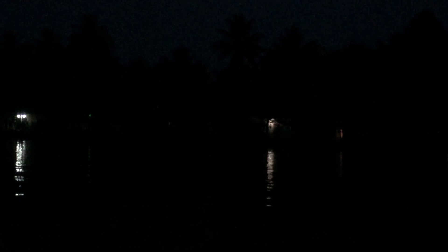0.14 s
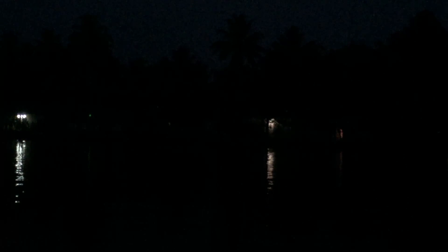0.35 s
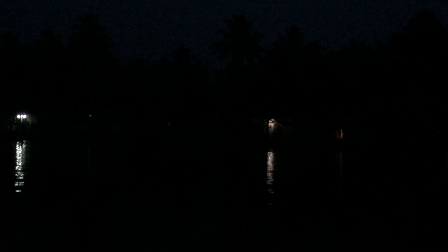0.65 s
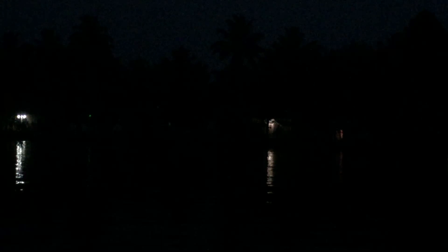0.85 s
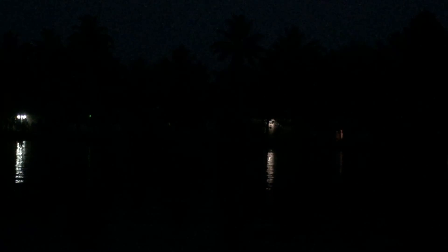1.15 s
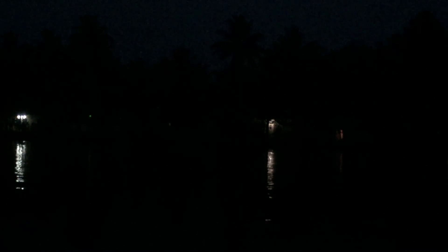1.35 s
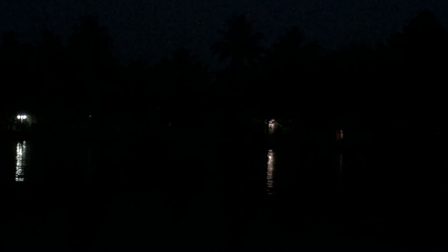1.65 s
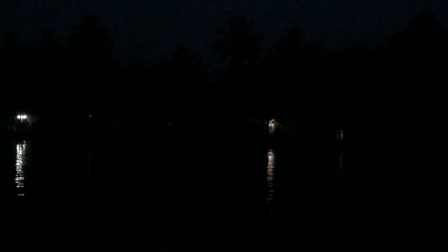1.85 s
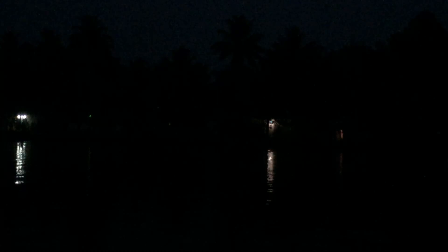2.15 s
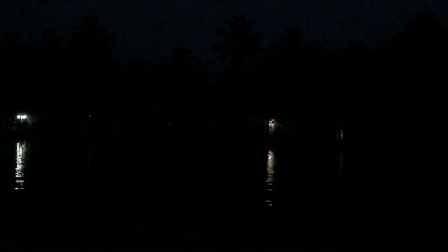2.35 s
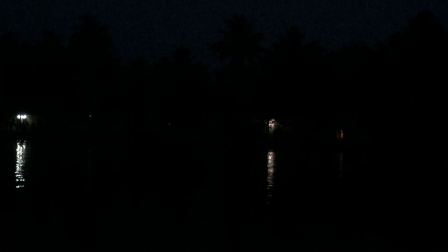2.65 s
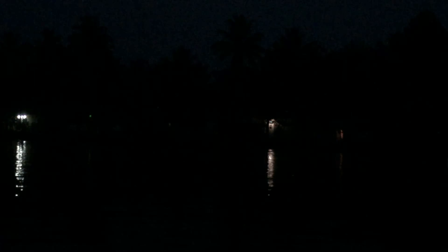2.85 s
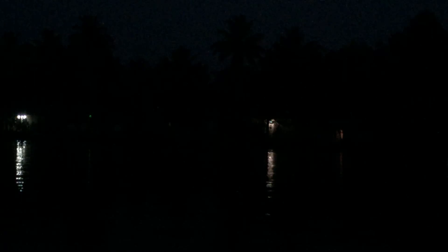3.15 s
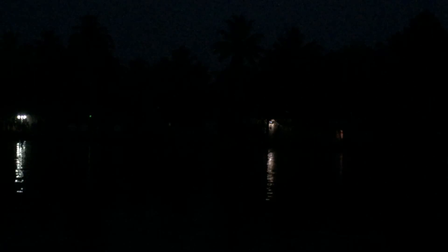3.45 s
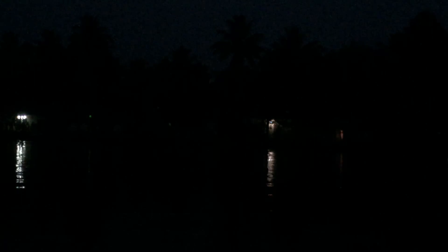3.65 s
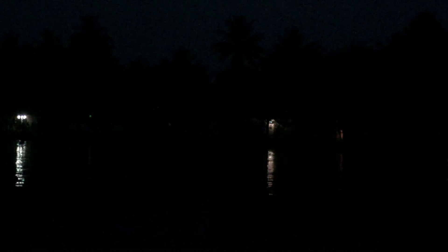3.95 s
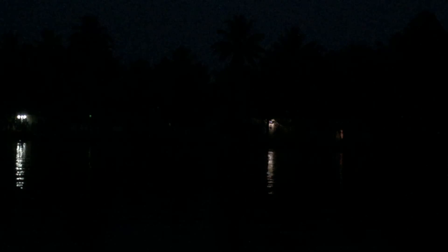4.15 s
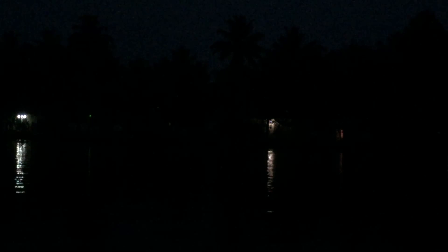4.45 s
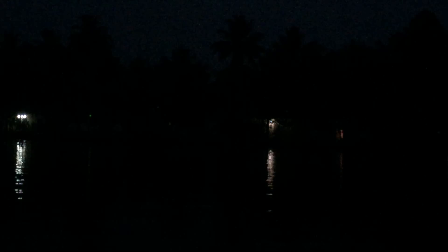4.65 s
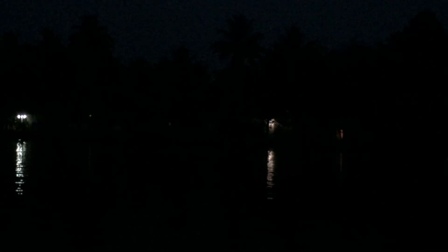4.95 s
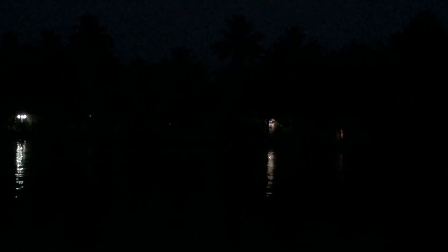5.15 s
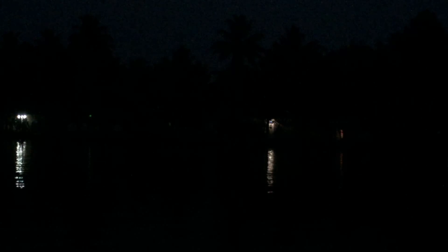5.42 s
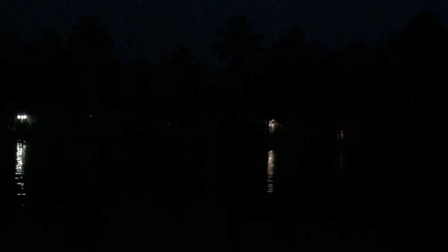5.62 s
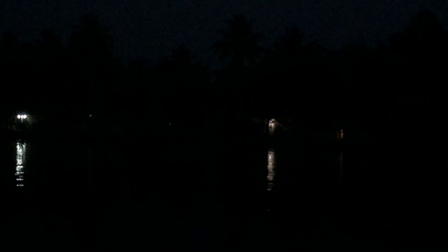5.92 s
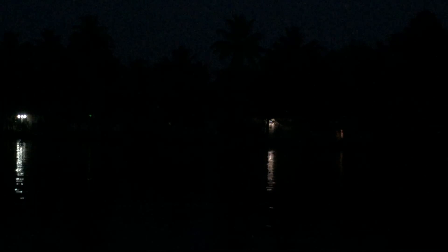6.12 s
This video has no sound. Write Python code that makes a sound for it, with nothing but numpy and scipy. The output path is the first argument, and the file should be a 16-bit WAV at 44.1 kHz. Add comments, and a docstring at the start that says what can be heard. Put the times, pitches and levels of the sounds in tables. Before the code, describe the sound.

Dawn chorus by a pond: one near bird whistles six rising double-humped notes over small birds' twittering, crow caws and a low hum.

```python
"""Dawn beside a pond ringed with trees: at once a low hum, a dull wash and a blurred far chorus of noise bands,
with small birds whistling and trilling on gliding sines and faint quick chirps heard only as echo.
Crows soon caw, harmonic voices coloured by the throat and roughened by a growl. One near bird then sings six
double-humped notes, each higher than the last: a nearly pure tone with breathy overtones.
Decaying noise echoes stand for the trees."""
import sys
import numpy as np
from scipy import signal
from scipy.fft import rfft, irfft
from scipy.io import wavfile

SR = 44100
rng = np.random.default_rng(int(sys.argv[2]) if len(sys.argv) > 2 else 0)


def output_pcm(signal):
    """Save a mono or channel-first signal as 16-bit PCM at the path in sys.argv[1].

    Samples are clipped to [-1, 1] before scaling.
    """
    pcm = np.clip(np.atleast_2d(signal).T, -1, 1) * 32767
    wavfile.write(sys.argv[1], SR, np.round(pcm).astype(np.int16))


N = 276948  # length in samples


def from_db(db):
    """Logarithmic level: 20 dB is a factor of ten in amplitude."""
    return 10 ** (np.asarray(db) / 20)


def rms_one(x):
    """Normalisation: the signal is divided by its root mean square."""
    return x / np.sqrt(np.mean(x ** 2) + 1e-20)


def resonance(x, hz, width_hz):
    """Damped oscillator: a pole pair whose radius sets the bandwidth, with gain 1 on top."""
    radius = np.exp(-np.pi * width_hz / SR)
    zeros = (1 - radius ** 2) / 2 * np.array([1, 0, -1])
    poles = [1, -2 * radius * np.cos(2 * np.pi * hz / SR), radius ** 2]
    return signal.lfilter(zeros, poles, x)


def drift(rate, size=N):
    """Low-passed chance: noise smoothed by a double pole, rms 1, changing about rate times a second."""
    r = np.exp(-2 * np.pi * rate / SR)
    warm_up = 8000
    noise = rng.standard_normal(size + warm_up)
    return rms_one(signal.lfilter([1], [1, -2 * r, r * r], noise)[warm_up:])


def band(low_hz, high_hz):
    """Band-limited noise: white noise between two edges, rms 1."""
    sos = signal.butter(3, [low_hz, high_hz], "band", fs=SR, output="sos")
    return rms_one(signal.sosfilt(sos, rng.standard_normal(N)))


def add(out, start_s, x):
    """Superposition: x is summed into out from start_s on."""
    i = max(round(start_s * SR), 0)
    out[i:i + len(x)] += x[:N - i]


def swell(length_s, rise_s, fall_s):
    """Amplitude envelope: sine-squared ends give a soft onset and release."""
    t = np.arange(round(length_s * SR)) / SR
    ramp = np.minimum(t / rise_s, (length_s - t) / fall_s)
    return np.sin(np.pi / 2 * np.clip(ramp, 0, 1)) ** 2


def glide(length_s, first_hz, middle_hz, last_hz):
    """Frequency glide: a parabola through three pitches."""
    u = np.linspace(0, 1, round(length_s * SR))
    return 2 * (u - .5) * (u - 1) * first_hz + 4 * u * (1 - u) * middle_hz + 2 * u * (u - .5) * last_hz


def turns(hz):
    """Phase is the running integral of frequency, in radians."""
    return 2 * np.pi * np.cumsum(hz) / SR


def background():
    """Broadband and resonant noise: still air, a patchy far wash, a rumble and its wavering hum."""
    # The spectrum of still air. Each row: frequency in Hz, relative level in dB per Hz.
    air_points = np.array([(200, -6.5), (480, -23), (900, -26), (2700, -24), (5000, -29.5), (9000, -39.5),
                           (16900, -51.5)])
    # The far wash drops out and returns; rumble and hum rise and fall together.
    # Each row: time in seconds, wash level in dB, rumble level in dB.
    far_noise = np.array([(0, -56.5, -60.5), (3.298, -55, -63), (3.5, -64.5, -57.5), (6.1, -106, -55.5),
                          (6.2, -57, -60)])
    air_db = -62

    hz = np.maximum(np.fft.rfftfreq(N, 1 / SR), 1)
    shape_db = np.interp(np.log(hz), np.log(air_points[:, 0]), air_points[:, 1])
    shape = from_db(shape_db) * (hz > 120)
    air = rms_one(irfft(rfft(rng.standard_normal(N)) * shape, N))
    air = from_db(air_db + 0.74 * drift(12.0)) * air

    t = np.arange(N) / SR
    wash_db = np.interp(t, far_noise[:, 0], far_noise[:, 1])
    rumble_db = np.interp(t, far_noise[:, 0], far_noise[:, 2])
    wash = from_db(wash_db + 2 * drift(6.3)) * band(313, 1780)

    hum = rms_one(resonance(rng.standard_normal(N), 96.8, 4.8))
    octave = rms_one(resonance(rng.standard_normal(N), 194, 11))
    hum = hum + from_db(-11.5) * octave
    rumble = from_db(rumble_db + drift(1.0)) * (band(43, 119.6) + hum)
    return air + wash + rumble


def far_chorus(count=8):
    """Incoherent summation: voices too many to tell apart become noise strands that come and go singly."""
    # Each row: centre in Hz, width in Hz, level in dB (the steady sum of strands has an rms 3 dB lower).
    chorus = [(335, 51.5, -71.5), (1500, 964, -59)]
    flicker_db = 4.5
    out = np.zeros(N)
    for hz, width, db in chorus:
        for place in np.linspace(-.5, .5, count):
            strand = rms_one(resonance(rng.standard_normal(N), hz + width * place, width / count))
            out += from_db(db + flicker_db * drift(4.7)) * strand / np.sqrt(2 * count)
    return out


def scooped(length_s, hz, drop=0):
    """Exponential approach: a pitch reached from just below and, for a hook, let go towards the end."""
    scoop_share, scoop_s = 0.0434, 0.016
    hook_late = 2.8  # power of time that delays the drop
    u = np.linspace(0, 1, round(length_s * SR))
    scoop = 1 - scoop_share * np.exp(-u * length_s / scoop_s)
    return hz * scoop * (1 - drop * u ** hook_late)


def slurred(length_s, first_hz, last_hz):
    """Decelerating glide: a slide that is quick at first and then eases."""
    halfway = .63  # share of the slide done at half time
    return glide(length_s, first_hz, first_hz + halfway * (last_hz - first_hz), last_hz)


def small_birds():
    """Frequency and amplitude modulation: gliding sines flutter in the air; trills swing pitch and level."""
    # Level whistles scooped up from below.
    # Each row: start in seconds, length in seconds, pitch in Hz, level in dB.
    held = [(0.094, 0.13, 3883, -65), (.21, 0.092, 2558, -59), (.63, 0.049, 841.5, -53),
            (0.678, 0.13, 3682, -50.5), (1.291, 0.049, 5430, -56.5), (3.624, 0.063, 1560, -53),
            (2.547, 0.056, 3150, -60), (3.826, 0.15, 3050, -69), (6.135, 0.094, 4320, -68),
            (3.255, 0.046, 3690, -54.5), (3.489, 0.13, 4230, -59.5), (3.639, 0.087, 4570, -58.5),
            (3.815, 0.089, 4230, -60), (4.311, 0.072, 4810, -62.5), (4.449, 0.1, 4760, -60.5),
            (4.585, 0.049, 5960, -68), (4.609, 0.098, 4460, -61.5), (4.855, 0.11, 3790, -65),
            (4.94, 0.093, 3560, -63.5), (5.198, 0.11, 5490, -66.5), (5.412, 0.074, 3940, -63),
            (5.55, 0.05, 4530, -62), (5.745, 0.053, 5583, -66), (5.87, 0.11, 3500, -50.5),
            (6.249, 0.045, 4090, -53.5)]
    # Whistles that hold, then drop at the end.
    # Each row: start in seconds, length in seconds, top pitch in Hz, level in dB.
    hooks = [(0.816, 0.061, 3822, -51), (2.486, 0.073, 4200, -64), (2.803, 0.057, 3150, -56),
             (5.089, 0.12, 3810, -49.5), (5.466, 0.059, 3750, -48.5), (5.57, 0.099, 3840, -50.5),
             (6.082, 0.085, 3373, -54)]
    # Slurs up or down.
    # Each row: start in seconds, length in seconds, first pitch in Hz, last pitch in Hz, level in dB.
    slurs = [(0, 0.065, 3610, 2970, -63.5), (.385, 0.049, 3400, 2800, -64), (5.062, 0.044, 4350, 3910, -57),
             (1.409, 0.28, 3935, 3388, -62.5), (1.819, 0.25, 2240, 2085, -59),
             (1.947, 0.18, 3403, 3654, -57), (2.343, .19, 2994, 2787, -55), (4.697, 0.04, 3800, 2600, -76),
             (2.927, 0.06, 3605, 3400, -51.5), (3.032, 0.07, 3540, 3060, -61.5),
             (3.322, 0.11, 4490, 3475, -66.5), (3.501, 0.89, 786, 707.7, -73.5),
             (3.875, 0.1, 3220, 4086, -56), (4.128, 0.088, 3730, 3490, -54.5),
             (4.349, 0.14, 3580, 4090, -60.5), (4.38, 0.088, 4400, 2940, -62),
             (4.486, 0.051, 3000, 3740, -57), (4.541, 0.051, 6150, 5130, -64),
             (4.583, 0.042, 3940, 4360, -59), (6.053, 0.043, 2990, 3330, -58),
             (5.379, 0.054, 2760, 3150, -62), (6.152, 0.1, 3970, 3280, -59.5)]
    # Short buzzy slurs.
    # Each row: start in seconds, length in seconds, first pitch in Hz, last pitch in Hz, level in dB.
    buzzes = [(1.861, 0.078, 4460, 3406, -52), (2.5, 0.119, 3200, 2950, -58),
              (2.215, 0.051, 3500, 3150, -60.5), (5.335, 0.041, 5450, 5050, -66.5),
              (2.688, 0.067, 4060, 4240, -52), (3.118, 0.052, 2880, 2500, -59.5),
              (3.28, 0.063, 3900, 4500, -60), (5.439, 0.044, 3300, 3600, -55),
              (5.794, 0.092, 4020, 3320, -58.5)]
    # Trilled notes. Each row: start in seconds, length in seconds, first, middle and last pitch in Hz,
    # level in dB, typical trills per second, pitch swing either way in Hz.
    trills = [(1.034, 0.24, 5040, 5877, 5510, -56.5, 52, 59.7),
              (1.523, 0.23, 4470, 4555, 4586, -52.5, 100, 60.5),
              (2.808, 0.12, 4360, 3910, 3580, -55, 49, 90), (3.984, .16, 5500, 5060, 3880, -66.5, 33, 203),
              (4.903, 0.24, 6120, 5184, 3860, -63, 42, 194)]
    hook_drop = .21  # share of the pitch lost
    buzz_per_s, buzz_swing_hz = 110, 231

    notes = [(start, scooped(length, hz), db, 0, 0) for start, length, hz, db in held]
    notes += [(start, scooped(length, hz, hook_drop), db, 0, 0) for start, length, hz, db in hooks]
    notes += [(start, slurred(length, first, last), db, 0, 0) for start, length, first, last, db in slurs]
    notes += [(start, slurred(length, first, last), db, buzz_per_s, buzz_swing_hz)
              for start, length, first, last, db in buzzes]
    notes += [(start, glide(*shape), db, rate, swing) for start, *shape, db, rate, swing in trills]

    out = np.zeros(N)
    for start, hz, db, rate, swing in notes:
        beat = np.sin(turns(rate * from_db(1.89 * drift(25, len(hz)))))  # zero for untrilled notes
        waver_hz = .004 * hz * drift(80, len(hz))
        tone = np.sin(turns(hz + swing * beat + waver_hz)) * (1 + .3 * beat)
        add(out, start, np.sqrt(2) * from_db(db) * swell(len(hz) / SR, .014, .018) * tone)
    flutter_db = 3.15 * drift(27)
    return out * from_db(flutter_db)


def chatter(count=160):
    """Random point process: faint quick falling chirps, many of them steep, at chance moments."""
    out = np.zeros(N)
    for when, long, pitch, bend, loud in rng.random((count, 5)):
        length, hz = 0.022 + 0.056 * long, 3100 + 1800 * pitch
        middle_hz, last_hz = hz * (.9 + 0.092 * bend), hz * (0.589 + 0.315 * bend)
        tone = np.sin(turns(glide(length, hz, middle_hz, last_hz)))
        add(out, when * N / SR, from_db(-67.0 + 6.9 * loud) * swell(length, 0.016, 0.023) * tone)
    return out


def crows():
    """Source and filter: arched harmonics weighted by a throat formant; growl and hoarseness roughen them."""
    # Each row: start in seconds, length in seconds, voice name, throat resonance in Hz, level in dB.
    caws = [(0.468, 0.14, "high", 1800, -50), (0.834, 0.13, "high", 1520, -47),
            (1.227, 0.17, "high", 1790, -48.5), (2.07, 0.1, "high", 1650, -42.5),
            (2.373, 0.15, "high", 1350, -47.5), (2.614, 0.25, "low", 1635, -48.5),
            (3.317, 0.15, "high", 1500, -47), (3.495, 0.21, "high", 1880, -58),
            (3.684, 0.11, "high", 1130, -48.5), (3.896, .48, "hoarse", 1806, -53),
            (4.363, 0.14, "hoarse", 1930, -53), (4.729, 0.17, "rasping", 1880, -51),
            (4.856, 0.25, "rasping", 1980, -51.5), (6.108, 0.23, "low", 1690, -49.5)]
    # Each named voice: top pitch in Hz, hoarseness from 0 to 1, throat width in Hz.
    voices = {"high": (552, .22, 680), "low": (515, .2, 500), "hoarse": (485, .4, 520),
              "rasping": (392, .5, 350)}
    growl_per_s = 76  # typical rate; it differs from caw to caw and wanders
    out = np.zeros(N)
    for start, length, crow, throat, db in caws:
        pitch, hoarse, width_hz = voices[crow]
        hz = glide(length, .89 * pitch, pitch, .87 * pitch)
        size = len(hz)
        growl_db = rng.normal(0, .7) + 3.5 * hoarse * drift(25, size)
        growl = turns(growl_per_s * from_db(growl_db))
        voice = np.zeros(size)
        for k in range(2, 8):
            # hoarseness blurs the upper harmonics most, and each swells and fades on its own
            phase = turns(hz) + .3 * np.cos(growl) + .5 * hoarse * drift(110, size)
            formant = np.exp(-((k * pitch - throat) / width_hz) ** 2)
            voice += formant * from_db(6 * hoarse * drift(10, size)) * np.sin(k * phase)
        rough = rms_one(voice * (1 + .8 * np.sin(growl)))
        add(out, start, from_db(db) * swell(length, .035, .035) * rough)
    return out


def near_bird():
    """Source and filter: a tone weak in the dip and last fall; overtones grow with effort, the beak resonates."""
    # The pitch climbs, dips, climbs again and falls away. Each row: start in seconds, first climb in seconds,
    # second climb in seconds, first top in Hz, second top in Hz, level in dB before the shaping below.
    song = [(0.672, 0.038, 0.0522, 1077, 1231, -31), (0.901, 0.069, 0.043, 1283, 1352, -27),
            (1.17, 0.072, 0.041, 1369, 1422, -26), (1.445, 0.072, 0.046, 1437, 1483, -25.5),
            (1.720, 0.065, 0.033, 1531, 1524, -25), (2.003, 0.056, 0.046, 1562, 1561, -25)]
    # Beak resonances that colour the overtones, each passed twice.
    # Each row: frequency in Hz, width of one pass in Hz, gain in dB.
    beak = [(3050, 710, -22.5), (4720, 890, -30), (6750, 1600, -33), (9480, 880, -38), (12760, 4400, -47)]
    # The tone thins out as it crosses these pitches. Each row: frequency in Hz, share lost.
    thin = [(1170, .9), (1455, .6)]
    thin_width_hz = 65
    dip_s, second_hump_s = .032, .105  # down into the dip; from the dip to the end
    dip_pitch, start_pitch, end_pitch = .865, .74, .71  # shares of the neighbouring top
    full_voice_db, dip_db, dip_deepens = -24.5, -0.5, 2.4  # below full voice the dip deepens, dB per dB
    attack_s, slow_start = 0.027, 1.8  # below full voice the first climb starts fainter, dB per dB
    overtone_effort = 1.6  # dB the overtones gain beyond the tone, per dB of voice
    overtone_waver = .015  # phase waver in radians, times the square of the multiple

    tone, overtones = np.zeros(N), np.zeros(N)
    for start, climb, climb2, top, top2, db in song:
        lengths = (climb, dip_s, climb2, second_hump_s - climb2)
        ramps = [np.linspace(0, 1, round(s * SR), endpoint=False) for s in lengths]
        down, up = (.5 - .5 * np.cos(np.pi * u) for u in ramps[1:3])
        low = dip_pitch * top
        hz = np.concatenate([
            top * (start_pitch + (1 - start_pitch) * np.sin(np.pi / 2 * ramps[0] ** 0.72)),
            top + (low - top) * down,
            low + (top2 - low) * up,
            top2 * (1 - (1 - end_pitch) * ramps[3] ** 1.7)])

        short_db = max(full_voice_db - db, 0)
        note_dip_db = dip_db - dip_deepens * short_db
        level_db = db + np.concatenate([
            -slow_start * short_db * (1 - ramps[0]),
            note_dip_db * down,
            note_dip_db * (1 - up),
            -8 * ramps[3]])
        gain = np.sqrt(2) * from_db(level_db) * swell(len(hz) / SR, attack_s, 0.0091)

        phase = turns(hz)
        stack = np.zeros(len(hz))
        for k in range(2, 11):
            partial = np.sin(k * (phase + overtone_waver * k * drift(90, len(hz))))
            strength = 0.5 + 0.79 * (k % 2)  # the odd multiples are the stronger
            stack += partial * strength * (1 + 0.13 * k * drift(300, len(hz)))
        effort = from_db(overtone_effort * (level_db - full_voice_db))
        add(tone, start, gain * np.sin(phase))
        add(overtones, start, gain * effort * stack)

    coloured = sum(from_db(db) * resonance(resonance(overtones, hz, width), hz, width)
                   for hz, width, db in beak)
    thinned = tone - sum(share * resonance(tone, hz, thin_width_hz) for hz, share in thin)
    return thinned, coloured


def trees(x, t60_s):
    """Reverberation: scattered echoes from trunks and banks, as exponentially dying noise of unit energy."""
    t = np.arange(SR) / SR
    echoes = rng.standard_normal(SR) * from_db(-60 * t / t60_s) * np.clip(t / 0.0031, 0, 1)
    return signal.fftconvolve(x, echoes / np.sqrt(np.sum(echoes ** 2)))[:N]


def scene():
    """Direct and reverberant sound: the near tone is fairly dry, others wetter, the chatter echo alone."""
    near_echo_db, far_echo_db = -10, -2
    small, caws = small_birds(), crows()
    near, overtones = near_bird()
    to_trees = from_db(near_echo_db) * near + from_db(far_echo_db) * caws + chatter()
    wet = trees(to_trees, 0.52)

    # stirring leaves blur the small birds' echoes and soak up the treble sooner
    small_echo_db = far_echo_db + 1.5 + 3.28 * drift(76)
    high_overtones = overtones - resonance(overtones, 3500, 2600)  # the low overtones stay clear
    to_leaves = from_db(small_echo_db) * small + from_db(2.5) * high_overtones
    wet += trees(to_leaves, 0.35)
    return (background() + far_chorus() + small + caws + near + overtones + wet)[None]


def record(dry):
    """Low-pass filtering: a steep elliptic filter cuts the top."""
    cutoff_hz = 17100
    return signal.sosfilt(signal.ellip(12, .5, 80, cutoff_hz, fs=SR, output="sos"), dry)


dry = scene()
out = record(dry)
output_pcm(out)
```